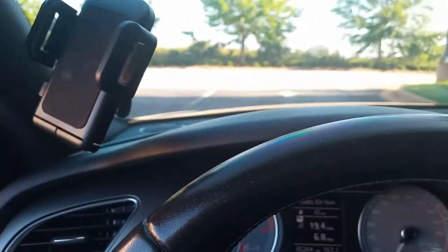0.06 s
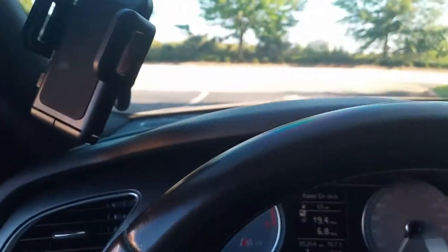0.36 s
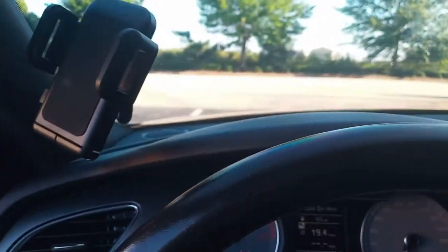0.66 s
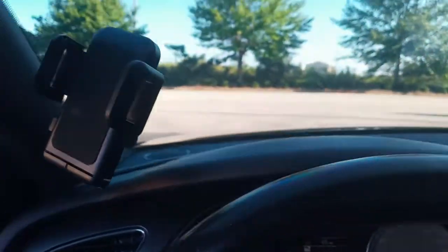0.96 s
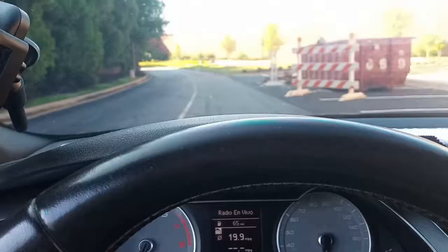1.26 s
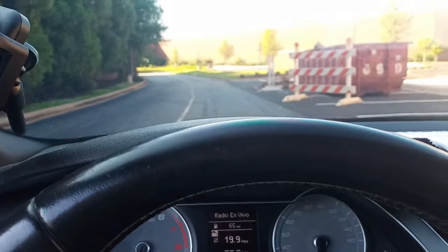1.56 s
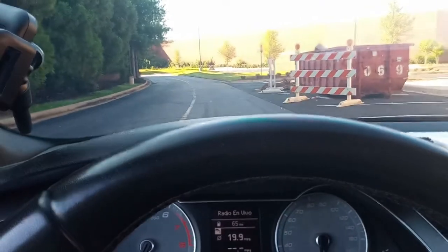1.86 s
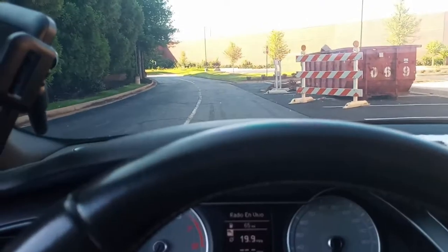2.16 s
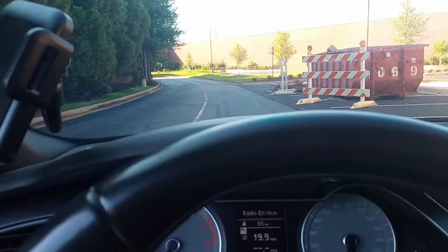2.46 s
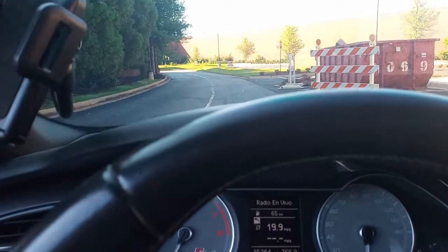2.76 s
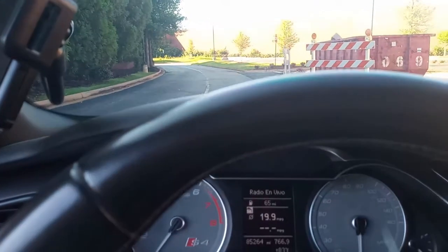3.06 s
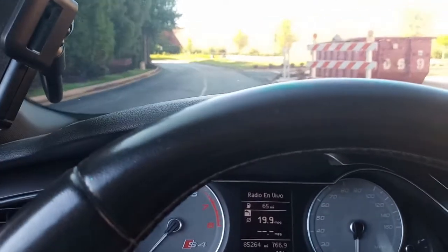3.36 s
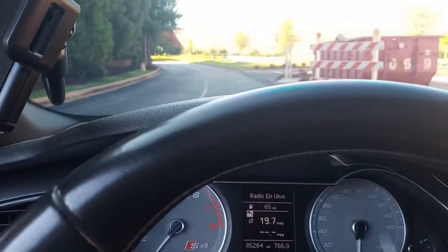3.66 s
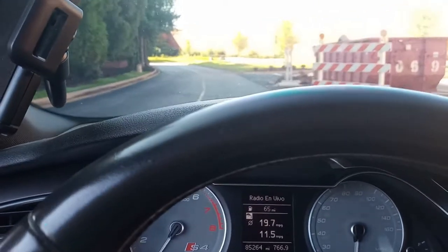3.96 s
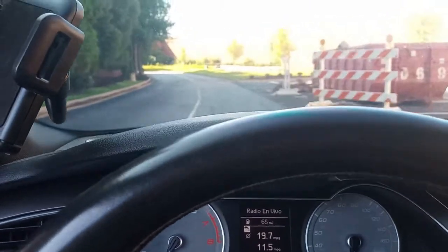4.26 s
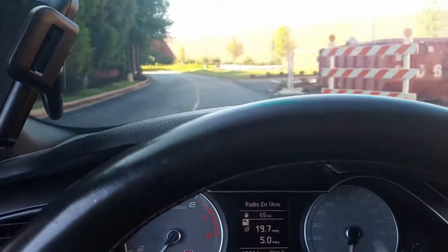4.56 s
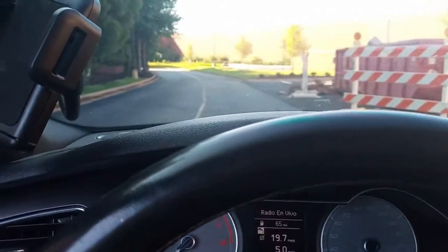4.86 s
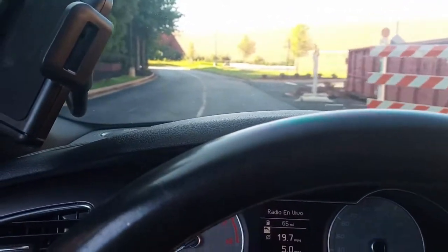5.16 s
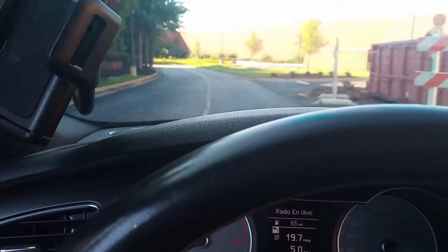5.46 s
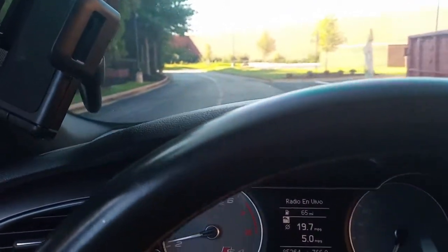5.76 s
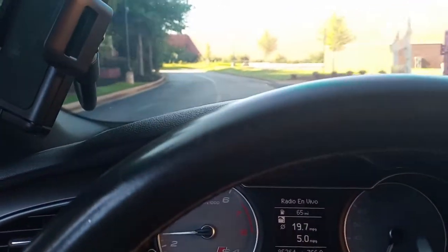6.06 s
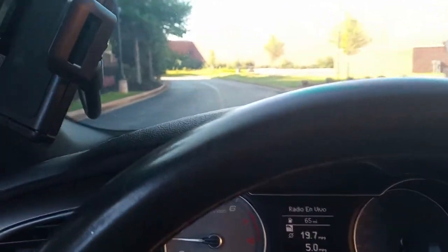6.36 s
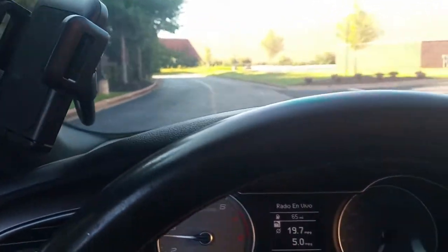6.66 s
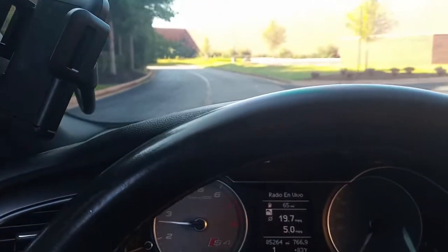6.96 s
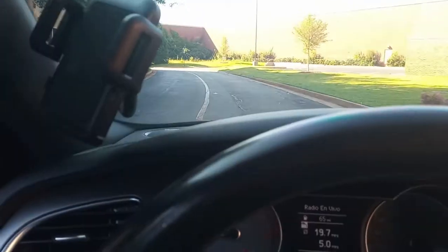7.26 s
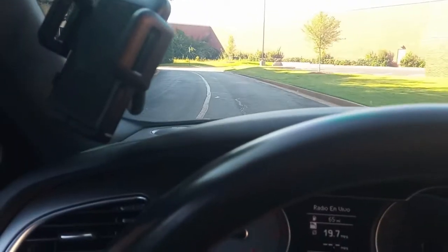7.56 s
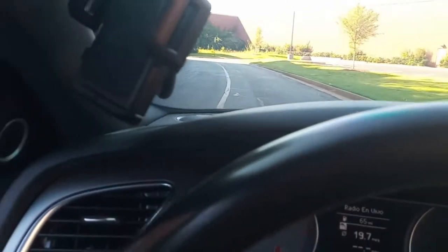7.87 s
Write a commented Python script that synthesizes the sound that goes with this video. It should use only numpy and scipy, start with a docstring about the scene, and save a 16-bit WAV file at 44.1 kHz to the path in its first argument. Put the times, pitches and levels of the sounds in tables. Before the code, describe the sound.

A car is heard from the driver's seat, slowing with a fading exhaust drone, tyre rumble and a soft hiss of released air. At about 1.2 seconds the sound drops out, then fades back in on a quiet idle, with air blowing from the vents and light knocks, clicks and scuffs around the cabin until 2.7 seconds. The engine then pulls away with a deep boom, sags around 4 seconds, and climbs steadily in pitch and loudness, strongest from about 5.6 to 6.4 seconds. Tyre rumble and hiss grow with speed, and a few more knocks sound, the sharpest near 5.4 seconds. At 6.4 seconds the throttle closes with a soft rush of air. Around 6.8 seconds the front wheels thump over a bump, followed by the rear. At 7.1 seconds the sound cuts to quieter coasting, with a low drone, road rumble and one dull knock.

```python
"""First you hear a six-cylinder car slowing down, from the driver's seat. The sound drops out at 1.2 s
and fades back in at idle, with things knocking about the cabin. The car pulls away hard and jolts over
a bump; at 7.1 s the sound cuts to the car coasting. Exhaust pulses make the cabin boom, tyres rumble
and hiss on the asphalt, louder with speed, and air blows from the dashboard vents."""
import sys
import numpy as np
from scipy import signal
from scipy.fft import rfft, irfft, next_fast_len
from scipy.io import wavfile
from scipy.ndimage import uniform_filter1d, map_coordinates

SR = 44100
rng = np.random.default_rng(int(sys.argv[2]) if len(sys.argv) > 2 else 0)


def generate_wav(sig):
    """Save sig (samples, or channels by samples) to the path in sys.argv[1] as 16-bit PCM at SR."""
    pcm = np.round(np.clip(np.atleast_2d(sig).T, -1, 1) * 32767).astype(np.int16)
    wavfile.write(sys.argv[1], SR, pcm)


N = 349713

# How often one bank (three of the six cylinders) fires: time_s, rate_hz
SLOWING_RATE = [(0, 33), (.45, 27.9), (1.19, 27.2), (1.25, 15)]
PULLING_RATE = [(2.75, 20.46), (2.87, 23.25), (3.06, 28.27), (3.201, 30.27), (3.29, 29.3), (3.44, 27.24),
                (4.03, 22.62), (4.191, 22.06), (4.409, 27.33), (4.53, 28.96), (4.86, 36.3), (5.14, 42.6),
                (5.25, 44.66), (5.34, 47.4), (5.62, 54.05), (6.231, 66.4), (6.89, 65.7), (7.126, 64)]
COASTING_RATE = [(7.135, 37.13), (7.93, 35.94)]
# How hard the engine works: time_s, effort_db
ENGINE_EFFORT = [(0, -8), (.45, -9.5), (.6, -13.5), (1.19, -15.5), (1.25, -34), (2.54, -35), (2.65, -19),
                 (2.75, -17.5), (2.85, -4), (4.0, -7), (4.19, -11), (4.35, -6), (5.4, -3), (5.65, -1),
                 (6.05, -0.5), (6.4, -1), (6.47, -7.5), (7.12, -7.5), (7.135, -14.5), (7.93, -10.5)]
# Exhaust notes: multiple_of_bank_rate, level_db
EXHAUST_NOTES = [(3, 1.5), (4, 5.5), (5, -0.5), (6, 2.5), (7, -0.5), (8, -6), (9, -7), (10, -13), (11, -4),
                 (12, 0), (13, -1), (14, -4.5), (15, -9)]
SLOWING_NOTES = [(7, -38.5), (12, -40)]
# The boost valve lets out air: start_s, end_s, level_db, fall_db_per_s
VALVE_RELEASES = [(0, .92, -54.5, 6), (6.392, 7.12, -49, 8.5)]
# Road speed: time_s, share_of_top_speed
ROAD_SPEED = [(0, 0.75), (.75, 0.51), (1.19, 0.37), (1.25, 0.054), (2.75, 0.08), (3.2, 0.25), (4.2, 0.14),
              (4.5, 0.38), (4.85, 0.42), (5.3, 0.56), (5.95, 0.79), (7.12, 0.99), (7.135, 0.6),
              (7.93, 0.57)]
# Extra rumble from coarse asphalt: time_s, gain_db
ROAD_COARSENESS = [(0, 0), (.45, -.5), (1.19, -0.5), (1.25, 0.5), (2.7, -1.5), (4.4, -1.5), (5.4, -1.5),
                   (6.4, -2), (7.12, -5), (7.135, 2), (7.93, 0)]
# Air from the vents: time_s, gain_db
AIRFLOW = [(0, -69.5), (1.19, -64.5), (1.25, -60.5), (2.7, -62), (3.0, -64.5), (4.2, -66), (4.6, -62),
           (5.5, -66), (7.12, -65.5), (7.14, -85)]

# Tone shapes, how strong each pitch is next to the others: pitch_hz, gain_db
CABIN_TONE = [(40, -40), (72, -22), (95, -15), (115, -10), (140, 0), (185, 0.5), (210, 1.5), (240, -6.5),
              (268, -5.5), (290, -21), (330, -18), (385, -8), (420, -8.5), (460, -14), (560, -17.5),
              (800, -33.5)]  # the cabin's boom
MOUNT_TONE = [(44, -19), (58, -16.5), (63, -10.5), (70, -13), (90, -12), (106, -2.5), (135, -2.5)]  # shake through the engine mounts
PIPE_TONE = [(200, -30), (330, 0), (450, 4.5), (600, -0.5), (800, -5), (1300, -13), (2200, -17),
             (4000, -46), (8000, -89)]  # muffled rush of exhaust gas
VALVE_TONE = [(900, -29), (1500, -9), (2300, 3), (3200, 1.5), (4300, -2), (5600, -7), (7200, -10.5),
              (9000, -21), (10000, -51)]  # air leaving the boost valve
DRONE_TONE = [(180, -29), (285, 3), (330, -2.5), (400, 1.5), (470, -3), (560, -19), (1200, -71)]  # air ringing inside a tyre; also the duct hum
RUMBLE_TONE = [(40, -43), (70, -25.5), (110, 1.5), (165, -1.5), (225, 4.5), (290, -10.5), (400, -21.5),
               (800, -66.5)]  # rumble of tyres and ducts
SHAKE_TONE = [(20, -24.5), (40, -9), (60, -3), (85, 7.5), (130, 2.5), (300, -70)]  # deep shake of the car body
ROAR_TONE = [(300, -35.5), (500, -1.5), (650, 1.5), (810, 3.5), (1050, -2.5), (1400, 0.5), (1620, -1.5),
             (1900, -4.5), (2200, -3.5), (2850, -15), (5000, -54)]  # tyre roar
HISS_TONE = [(1500, -26.5), (2600, 0), (3100, -1.5), (3900, 1.5), (4900, -3.5), (5600, -2), (6600, -10.5),
             (7200, -6.5), (8000, -22.5), (8800, -17.5), (10000, -55), (16000, -25)]  # hiss of tyres and vents, plus a faint, very high hiss
VENT_TONE = [(250, -18.5), (480, -2.5), (570, -2), (720, 1), (1100, -9), (1800, -7), (2800, -22),
             (4400, -10.5), (5000, -18.5), (5600, -9.5), (6400, -21), (7200, -11.5), (8100, -24),
             (10400, -21.5), (10800, -35), (15700, -26.5)]  # vent air, plus a faint, very high hiss
BUMP_TONE = [(4000, 1.5), (5500, -8.5), (9000, 4), (10000, -17), (12000, 0.5)]  # treble of the jolts: a dip near 10 kHz, with faint fizz above

# How parts ring when struck: pitch_hz, width_hz, gain_db
TRIM_RING = [(660, 165, 8), (930, 540, -1), (1205, 200, 1.5), (1910, 620, -9.5)]
CLIP_RING = [(2640, 760, 5.5), (4630, 650, 1), (5760, 1500, -2.5)]
PANEL_RING = [(161, 65, 4.5), (302, 140, 0), (403, 92, -4)]
BODY_RING = [(137, 54, 7), (255, 210, -4.5), (384, 40, 4.5), (493, 89, -35)]

# Faint high whistles: start_s, end_s, pitch_hz, level_db
HIGH_WHISTLES = [(.88, 1.172, 10100, -77), (7.21, 7.457, 8600, -76)]
# Knocks in the cabin (harder means more clack): start_s, level_db, hardness_db, clack_hz
CABIN_KNOCKS = [(.881, -43, 1.5, 1050), (1.106, -48.5, -0.5, 1260), (1.395, -39, -15, 705),
                (1.410, -46.5, -6, 698), (1.474, -39, -11.5, 874), (1.49, -47, -9, 867),
                (1.534, -39.5, -19, 620), (1.62, -36.5, -13.5, 800), (1.635, -30.5, -17, 850),
                (1.645, -39, -17, 846), (1.851, -34.5, -29, 670), (1.865, -38.5, -14, 674),
                (1.877, -44, -11, 674), (1.933, -36.5, -4, 680), (2.04, -42, -22, 690),
                (2.085, -45, -16, 850), (2.112, -43, -17, 697), (2.303, -47, -21, 1100),
                (2.368, -48.5, -16, 550), (2.451, -46.5, -26, 700), (2.538, -40, -21, 700),
                (2.576, -37.5, -19, 704), (2.683, -44.5, -25, 698.3), (4.61, -41, -13, 1200),
                (4.652, -46, -9, 1098), (4.851, -39, -8, 795), (5.363, -30.5, -4, 1049),
                (7.437, -30.5, -29, 873.5)]
# Small plastic clicks: start_s, level_db, treble_db
PLASTIC_CLICKS = [(1.108, -63, -64), (1.662, -55, -83), (1.959, -65, -71), (2.954, -60, -86),
                  (4.469, -52, -66), (7.85, -55, -83)]
# Strokes over the trim: start_s, end_s, level_db
TRIM_SCUFFS = [(1.594, 1.674, -53), (1.845, 1.912, -57.5), (1.93, 1.983, -52)]
# The front wheels hit the bump: start_s, level_db, hardness_db
WHEEL_JOLTS = [(6.799, -26, -14), (6.824, -23.5, -11.5), (6.844, -23, -10.5), (6.881, -25.5, -10.5),
               (6.897, -33.5, 3)]

TIME_S = np.arange(N) / SR


def amp(db):
    """Turn decibels into a number to multiply by."""
    return 10 ** (np.asarray(db) / 20)


def unit(x):
    """Scale a sound to an average strength (rms) of 1."""
    return x / np.sqrt(np.mean(x ** 2) + 1e-20)


def gain_at(tone, hz):
    """Read a tone shape's gain at any pitch."""
    pitches, db = np.transpose(tone)
    return amp(np.interp(np.log(hz + 1), np.log(pitches + 1), db))


def curve(*tables):
    """Join timed points with straight lines, one value per sample."""
    times, values = np.vstack(tables).T
    return np.interp(TIME_S, times, values)


def wobble(rate):
    """A smooth curve through `rate` random values a second."""
    points = rng.standard_normal(int(N * rate / SR) + 4)
    coarse = np.arange(0, N, 32)
    return np.interp(np.arange(N), coarse, map_coordinates(points, [coarse * rate / SR]))


def swell(start_s, end_s):
    """Rise smoothly from 0 to 1 and fall back."""
    return np.sin(np.pi * np.clip((TIME_S - start_s) / (end_s - start_s), 0, 1))


def filtered(x, response):
    """Turn each pitch in x up or down by response(hz)."""
    size = next_fast_len(len(x) + SR // 4)
    hz = np.fft.rfftfreq(size, 1 / SR)
    return irfft(rfft(x, size) * response(hz), size)[:len(x)]


def noise(tone):
    """Noise of strength 1 with the given tone shape."""
    return unit(filtered(rng.standard_normal(N), lambda hz: gain_at(tone, hz)))


def ring(x, modes):
    """Play x through something that rings at a few pitches."""
    return filtered(x, lambda hz: sum(
        (-1) ** k * amp(db) * 1j * hz * width / (pitch ** 2 - hz ** 2 + 1j * hz * width)
        for k, (pitch, width, db) in enumerate(modes)))


def band(x, pitch_hz, width_hz):
    """Keep the part of x near one pitch."""
    mode = [(pitch_hz, width_hz, 0)]
    return ring(ring(x, mode), mode)


def reflections(x, wet, fade_s, drift, count):
    """Short echoes off glass and dashboard colour the sound, in a drifting mix."""
    t = np.arange(SR // 16) / SR
    tails = rng.standard_normal((count, len(t))) * amp(-60 * t / fade_s)
    tails /= np.linalg.norm(tails, axis=1, keepdims=True)
    shares = np.array([wobble(drift) for _ in tails])
    shares /= np.linalg.norm(shares, axis=0)
    echoes = signal.fftconvolve(x[None], tails, axes=1)[:, :N]
    return (x + wet * np.sum(shares * echoes, axis=0)) / np.hypot(1, wet)


def flicker(x, depth_db):
    """Turn random patches of x up or down, each about 260 Hz wide and 50 ms long."""
    spectrum = signal.stft(x, nperseg=512)[2]
    patches = rng.standard_normal(spectrum.shape)
    for axis, span in enumerate((3, 8)):
        patches = uniform_filter1d(patches, span, axis)
    return signal.istft(spectrum * amp(depth_db * unit(patches)), nperseg=512)[1][:N]


def engine_boom(bank_hz, phase, level_db=-32, flutter_db=0.6, burble_db=1.1, uneven_db=-19):
    """Exhaust notes sweep through the cabin's boom, and the firings shake the engine mounts."""
    effort_db = curve(ENGINE_EFFORT)
    beat_db = 7 + 1.44 * effort_db  # the two banks beat against each other, more under load
    # Unequal cylinders add weak notes at thirds of the bank rate.
    weak_notes = [(k / 3, uneven_db) for k in range(4, 23) if k % 3]
    notes, power = np.zeros(N), np.zeros(N)
    for multiple, db in EXHAUST_NOTES + weak_notes:
        hz = multiple * bank_hz
        gain = amp(db + beat_db * (multiple % 2 == 1)) * gain_at(CABIN_TONE, hz)
        # The cabin delays notes unequally; echoes and swirling gas blur the high ones.
        lag = np.pi * ((np.clip(hz, 85, 285) - 175) / 52) ** 2
        blur = (hz / 500) ** 2 * rng.standard_normal() + 0.061 * (hz / 200) ** 2 * wobble(30)
        notes += gain * amp(flutter_db * wobble(8.3)) * np.cos(multiple * phase - lag + blur)
        power += gain ** 2 / 2
    firings = np.tanh(rng.standard_normal(N // 100))  # no two are equally strong
    burble = amp(burble_db * np.interp(phase / np.pi, np.arange(len(firings)), firings))
    shake = gain_at(MOUNT_TONE, 2 * bank_hz) * amp(flutter_db * wobble(14))
    mounts = shake * np.sqrt(2) * np.cos(2 * phase)
    return amp(level_db + effort_db) * burble * (notes / np.sqrt(power) + mounts)


def exhaust_rasp(bank_hz, phase, level_db=-45, growl_db=-8):
    """Each firing sends a pressure kick and a puff of gas down the pipe, louder with effort and revs."""
    puffs = np.exp(0.25 * np.cos(2 * phase) + 0.22 * np.cos(phase))
    firings = np.diff(np.floor(phase / np.pi), prepend=0)
    kicks = firings * puffs * amp(1.6 * wobble(100))
    gas = unit(puffs * rng.standard_normal(N)) + amp(growl_db) * unit(kicks)
    muffled = filtered(gas, lambda hz: gain_at(PIPE_TONE, hz))
    rasp = reflections(muffled, wet=1.5, fade_s=0.057, drift=4, count=3)
    return amp(level_db + curve(ENGINE_EFFORT)) * (bank_hz / 60) ** 2.66 * unit(rasp)


def slowing_notes(phase, fall_db_per_s=21):
    """With the foot off the pedal, two exhaust notes sing out hoarsely and fade."""
    notes = np.zeros(N)
    for multiple, db in SLOWING_NOTES:
        level = amp(db - fall_db_per_s * TIME_S + 2 * wobble(25))
        notes += level * np.cos(multiple * phase + 0.25 * wobble(40))
    return notes


def boost_valve(phase, rise_s=0.028, throb=0.19):
    """Spare compressed air rasps out when the throttle closes, pulsing with the engine."""
    flow = np.zeros(N)
    for start_s, end_s, db, fall_db_per_s in VALVE_RELEASES:
        opening = np.clip(np.minimum(TIME_S - start_s, 2 * (end_s - TIME_S)) / rise_s, 0, 1)
        flow += opening * amp(db - fall_db_per_s * np.abs(TIME_S - start_s))
    return flow * amp(1.2 * wobble(120)) * (1 + throb * np.cos(2 * phase)) * noise(VALVE_TONE)


def tyres(phase, throb=0.034):
    """Tyres roll on coarse asphalt; roar and hiss grow fastest with speed."""
    speed = curve(ROAD_SPEED)
    texture = wobble(45)
    drone = amp(-40.5 + wobble(25)) * speed ** 1.02 * noise(DRONE_TONE)
    rumble = amp(-35.5 + wobble(26)) * speed ** 0.78 * noise(RUMBLE_TONE)
    shake = amp(-44) * speed ** 1.27 * noise(SHAKE_TONE)
    roar = amp(-41 + 1.3 * texture + 0.8 * wobble(150)) * speed ** 1.87 * noise(ROAR_TONE)
    roar *= 1 + throb * np.cos(2 * phase)  # the exhaust's rush throbs in it at each firing
    hiss = amp(-49 + 0.5 * texture + 1.4 * wobble(300)) * speed ** 2.23 * noise(HISS_TONE)
    highs = reflections(roar + hiss, wet=0.6, fade_s=0.041, drift=5, count=5)
    return drone + amp(curve(ROAD_COARSENESS)) * (rumble + shake) + highs


def ventilation(whirr_hz=1630):
    """The fan whirrs, and its air rumbles in the ducts and hisses from the vents."""
    whirr = unit(band(rng.standard_normal(N), whirr_hz, width_hz=280))
    whirr *= amp(-8 + 4 * np.tanh(wobble(20)))
    rumble = amp(4 + 4 * wobble(13)) * noise(RUMBLE_TONE)
    hum = amp(4.5 + 1.5 * wobble(15)) * noise(DRONE_TONE)
    jets = flicker(noise(VENT_TONE) + amp(-9) * noise(HISS_TONE), depth_db=2.6)
    hiss = reflections(jets, wet=0.78, fade_s=0.058, drift=1.5, count=4)
    return amp(curve(AIRFLOW)) * (rumble + hum + whirr + hiss)


def rustle(level_db=-70, shift_s=(1.15, 2.33), shift_db=5.4):
    """Trim and seats creak and tick faintly, more as the driver shifts in the seat."""
    def grains():
        """Noise that comes in clumps."""
        return rng.standard_normal(N) * amp(6 * np.tanh(wobble(13)) + 5.4 * wobble(180))
    creaks = unit(sum(amp(db) * band(grains(), hz, width) for hz, width, db in TRIM_RING))
    ticks = unit(ring(ring(grains(), CLIP_RING), CLIP_RING))
    return amp(level_db + shift_db * swell(*shift_s)) * (creaks + amp(-7) * ticks)


def rattles(per_s=8.1, level_db=-76.5, fade_s=0.06):
    """Loose dashboard parts touch at random moments, each with a short, dull scuffle."""
    t = np.arange(SR // 8) / SR
    touches = (rng.random(N) < per_s / SR) * amp(4 * np.tanh(rng.standard_normal(N)))
    scuffle = signal.fftconvolve(touches, amp(-60 * t / fade_s))[:N] * rng.standard_normal(N)
    clacks = unit(ring(ring(scuffle, TRIM_RING), TRIM_RING))
    ticks = unit(ring(ring(scuffle, CLIP_RING), CLIP_RING))
    return amp(level_db) * (clacks + amp(-9) * ticks)


def tyre_scrub(start_s=0.76, end_s=1.33, level_db=-53):
    """The tread scrubs sideways in a tight turn."""
    scrub = unit(band(rng.standard_normal(N), pitch_hz=1600, width_hz=1300))
    return amp(level_db) * swell(start_s, end_s) * scrub


def whistles(waver_hz=70):
    """Thin, unsteady tones swell and fade."""
    tones = np.zeros(N)
    for start_s, end_s, hz, db in HIGH_WHISTLES:
        phase = 2 * np.pi * np.cumsum(hz + waver_hz * wobble(200)) / SR
        tones += amp(db) * swell(start_s, end_s) * np.sin(phase)
    return tones


def strikes(blows, thud_ring, rise_s, snap, spread, mix_db, fade_cycles=48, thud_hz=250, crack=0):
    """Each blow snaps and scuffles, ringing a thud, a clack and a tick, balanced by mix_db."""
    thud_db, clack_db, tick_db = mix_db
    out, t = np.zeros(N + SR), np.arange(SR // 3) / SR
    for start_s, level_db, hardness_db, clack_hz in blows:
        fade_s = fade_cycles / clack_hz  # higher clacks die sooner
        force = amp(-60 * t / fade_s) * (1 - np.exp(-t / rise_s))
        # A hard, high knock is closer to one clean, broad crack.
        clean = crack * amp(min(hardness_db, 0)) * (clack_hz / 1000) ** 2
        parts = [(thud_ring, thud_db, thud_hz, thud_hz),
                 (TRIM_RING, hardness_db + clack_db, clack_hz, spread * clack_hz * (1 + clean)),
                 (CLIP_RING, hardness_db + tick_db, 3900, 3900)]
        for modes, part_db, pitch_hz, width_hz in parts:
            push = force / np.linalg.norm(force) * rng.standard_normal(len(t))
            push[SR // 1000] += snap + clean
            ringing = ring(band(push, pitch_hz, width_hz), modes)
            ringing /= np.std(ringing[:SR // 40])
            out[round(start_s * SR):][:len(t)] += amp(level_db + part_db) * ringing
    return out[:N]


def knocks():
    """Loose things knock against the cabin panels."""
    return strikes(CABIN_KNOCKS, PANEL_RING, rise_s=0.00039, snap=0.4, spread=0.52,
                   mix_db=(-5, -2.5, -27), crack=1.6)


def clicks(clack_hz=775, treble_fade_s=0.07):
    """Small plastic parts click, each with a thin, quickly fading treble."""
    blows = [(start_s, db, 0, clack_hz) for start_s, db, _ in PLASTIC_CLICKS]
    clacks = strikes(blows, PANEL_RING, rise_s=0.00061, snap=0.22, spread=1, mix_db=(0, -3, -3))
    fades = sum((TIME_S >= start_s) * amp(db - 60 * np.abs(TIME_S - start_s) / treble_fade_s)
                for start_s, _, db in PLASTIC_CLICKS)
    treble = unit(band(rng.standard_normal(N), pitch_hz=13500, width_hz=4000))
    return clacks + fades * treble


def scuffs():
    """Sleeves and hands brush the trim in short, grainy strokes."""
    grains = rng.standard_normal(N) * amp(3 * wobble(230))
    strokes = sum(amp(db) * swell(start_s, end_s) for start_s, end_s, db in TRIM_SCUFFS)
    return strokes * unit(band(grains, pitch_hz=1700, width_hz=1900))


def belt_whine(start_s=2.1, end_s=3.7, level_db=-68):
    """A faint, fuzzy whine swells and flutters as the engine revs."""
    level = amp(level_db + 4 * np.tanh(wobble(12))) * swell(start_s, end_s)
    return level * unit(band(rng.standard_normal(N), pitch_hz=1570, width_hz=170))


def bump(rear_lag_s=0.222, rear_db=-6.5, clack_hz=994, stop_s=7.131):
    """Front wheels, then rear wheels, jolt the car body; the ringing stops dead at stop_s."""
    axles = [(0, 0), (rear_lag_s, rear_db)]
    blows = [(start_s + lag_s, db + axle_db, hardness_db, clack_hz)
             for lag_s, axle_db in axles for start_s, db, hardness_db in WHEEL_JOLTS]
    jolts = strikes(blows, BODY_RING, rise_s=0.0029, snap=0.21, spread=0.6,
                    mix_db=(-5, -4, -10), fade_cycles=97, thud_hz=322)
    return filtered(jolts, lambda hz: gain_at(BUMP_TONE, hz)) * (TIME_S < stop_s)


def scene():
    """Add up everything heard at the driver's seat."""
    bank_hz = curve(SLOWING_RATE, PULLING_RATE, COASTING_RATE)
    # The two banks take turns, so a cylinder fires every half turn of this phase.
    phase = 2 * np.pi * np.cumsum(bank_hz * (1 + 0.0017 * wobble(25))) / SR
    exhaust = engine_boom(bank_hz, phase) + exhaust_rasp(bank_hz, phase) + slowing_notes(phase)
    driving = exhaust + boost_valve(phase) + tyres(phase) + tyre_scrub() + bump()
    inside = ventilation() + rustle() + rattles() + knocks() + clicks() + scuffs()
    return (driving + inside + whistles() + belt_whine())[None]


def record(dry, drop_s=1.184, return_s=1.25, fade_in_s=0.24, top_hz=15750):
    """Drop briefly to near silence, fade back in, and remove the highest treble."""
    fade_in = np.clip((TIME_S - return_s) / fade_in_s, 0.002, 1)
    volume = np.where(TIME_S < drop_s, 1, fade_in)
    return filtered(dry[0] * volume, lambda hz: hz < top_hz)[None]


dry = scene()
out = record(dry)
generate_wav(out)
```